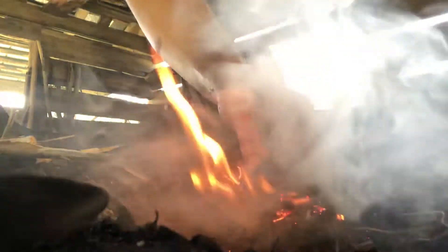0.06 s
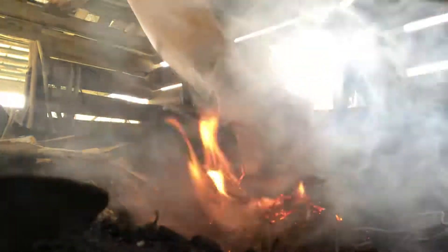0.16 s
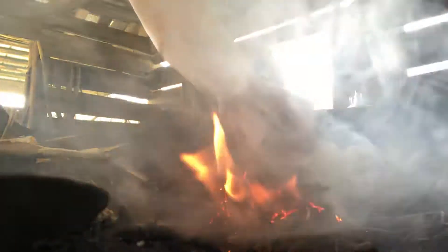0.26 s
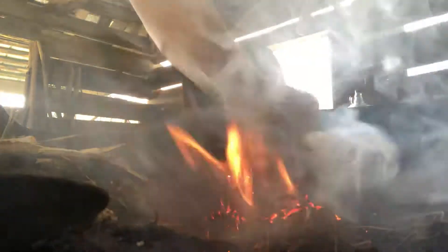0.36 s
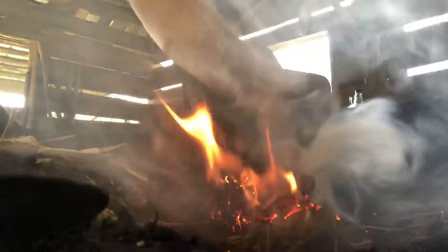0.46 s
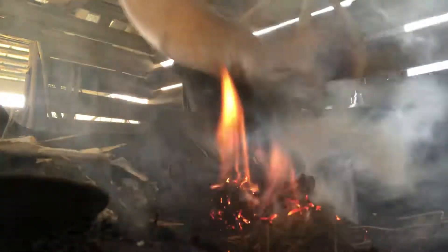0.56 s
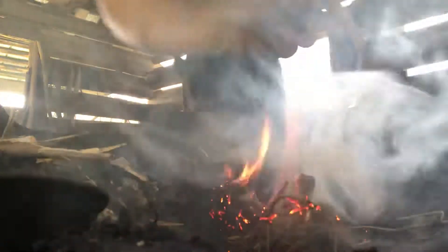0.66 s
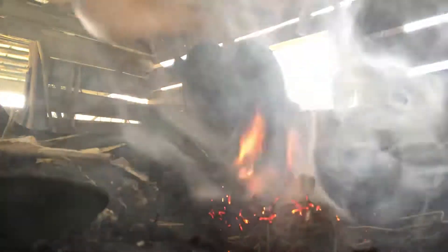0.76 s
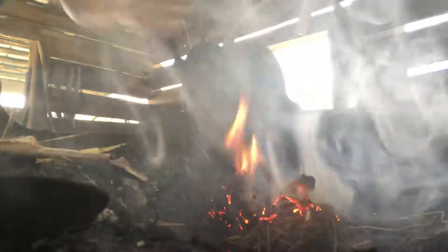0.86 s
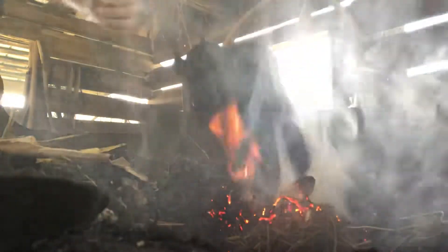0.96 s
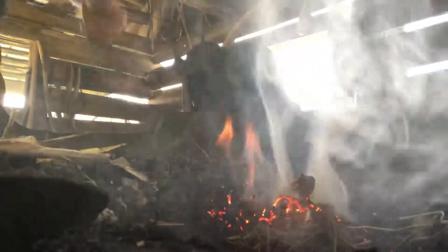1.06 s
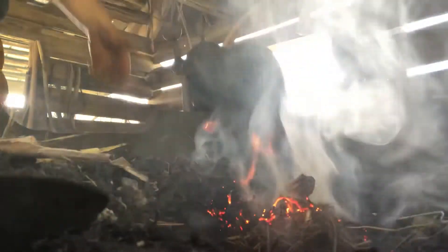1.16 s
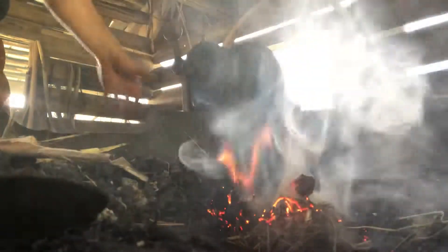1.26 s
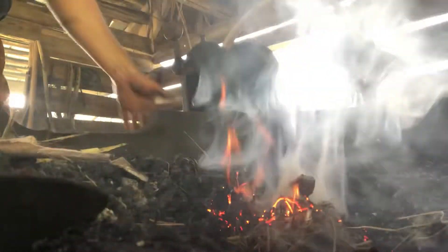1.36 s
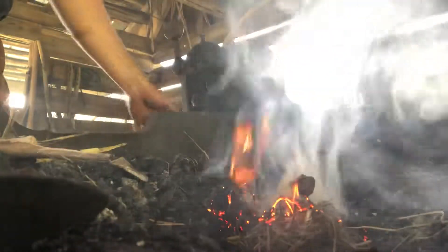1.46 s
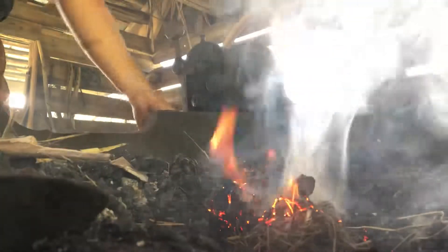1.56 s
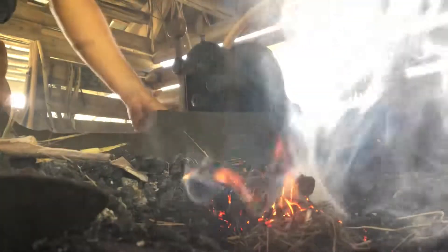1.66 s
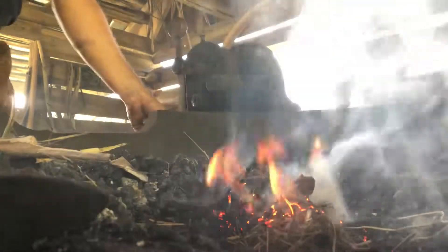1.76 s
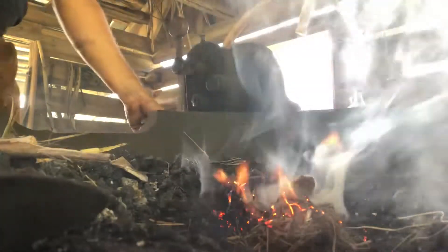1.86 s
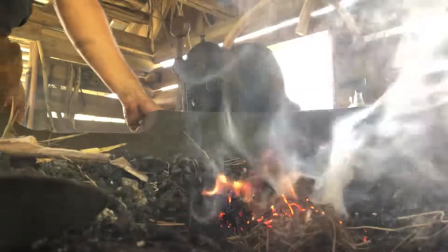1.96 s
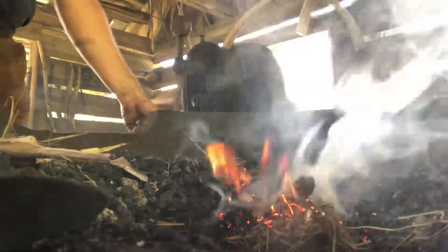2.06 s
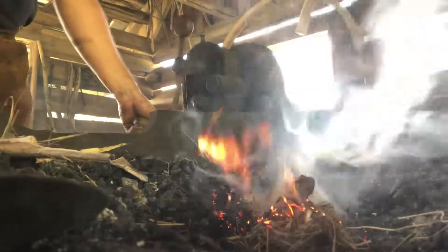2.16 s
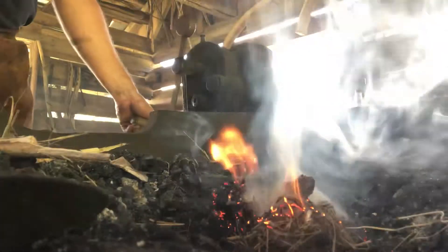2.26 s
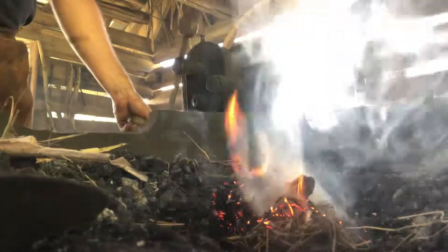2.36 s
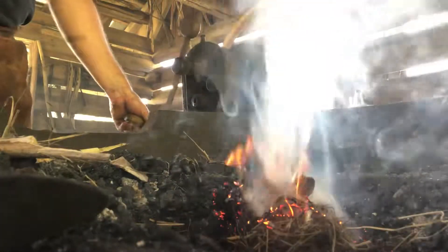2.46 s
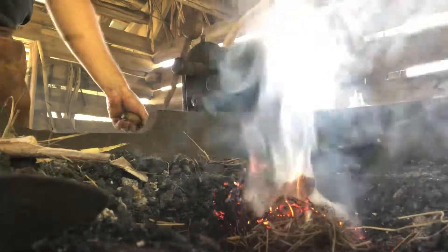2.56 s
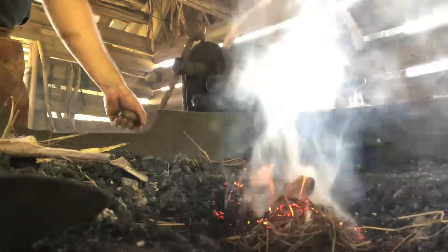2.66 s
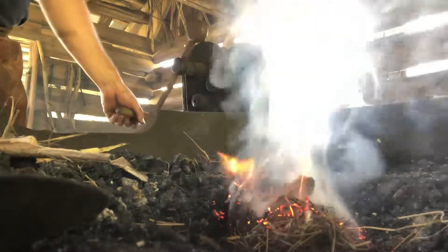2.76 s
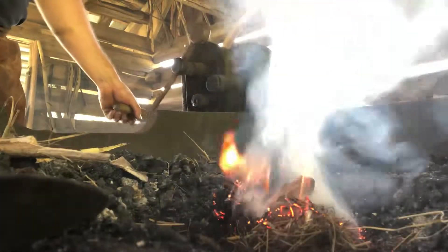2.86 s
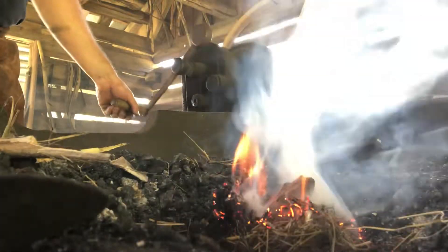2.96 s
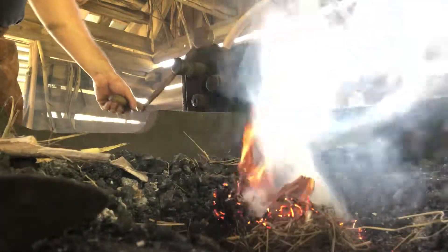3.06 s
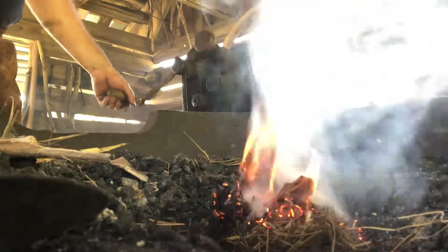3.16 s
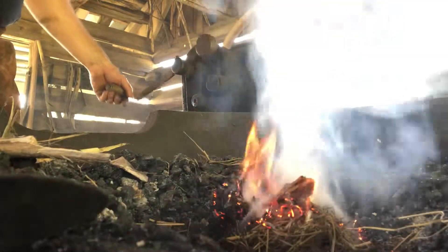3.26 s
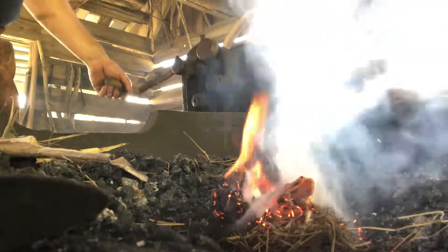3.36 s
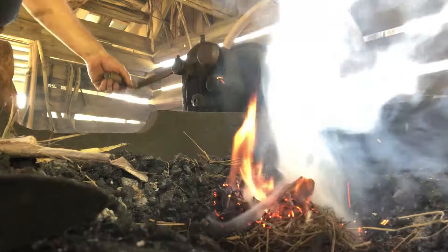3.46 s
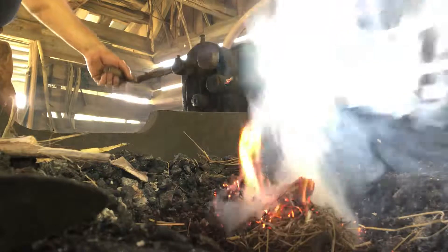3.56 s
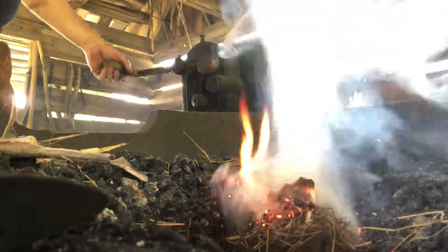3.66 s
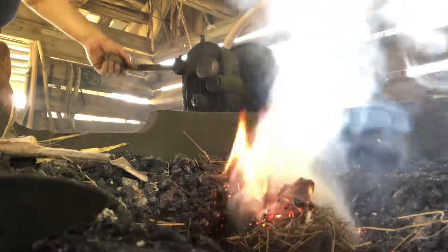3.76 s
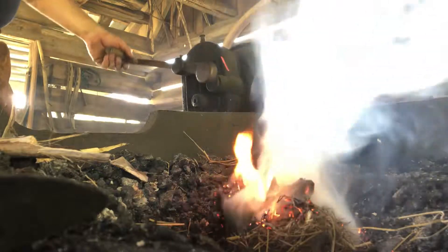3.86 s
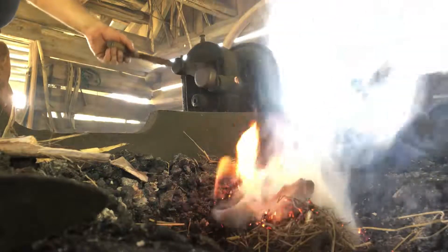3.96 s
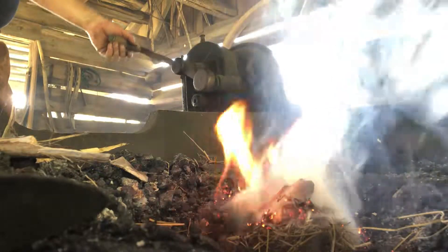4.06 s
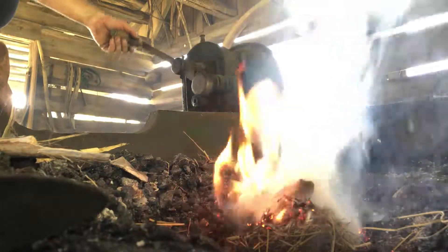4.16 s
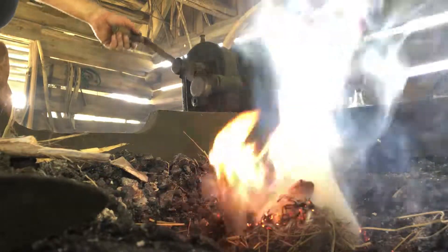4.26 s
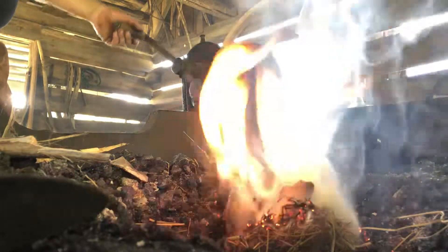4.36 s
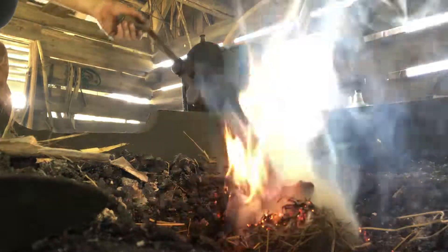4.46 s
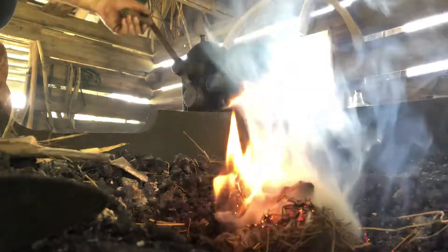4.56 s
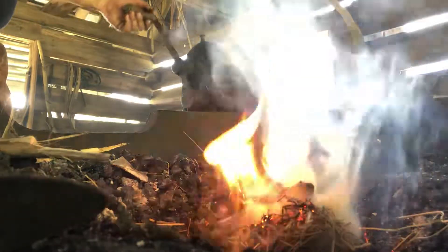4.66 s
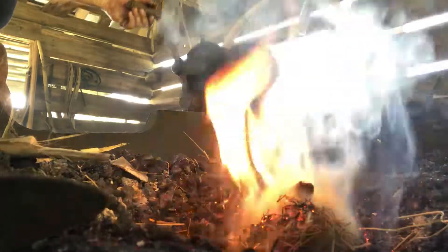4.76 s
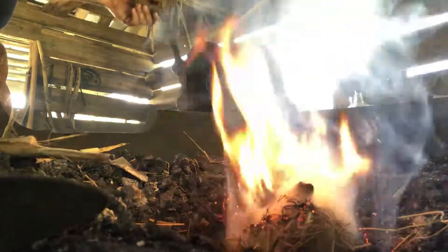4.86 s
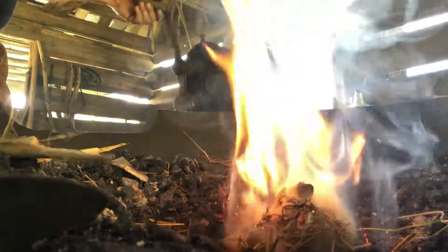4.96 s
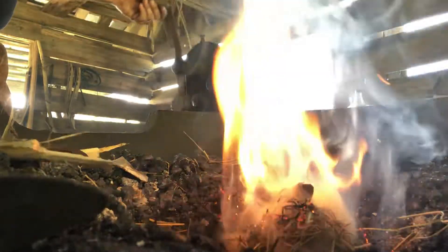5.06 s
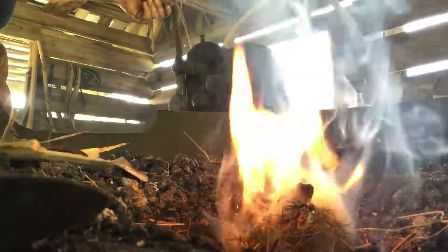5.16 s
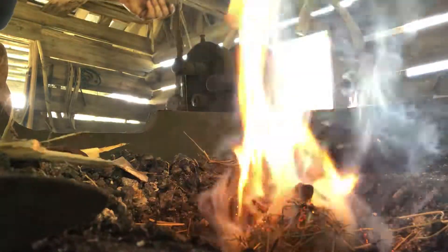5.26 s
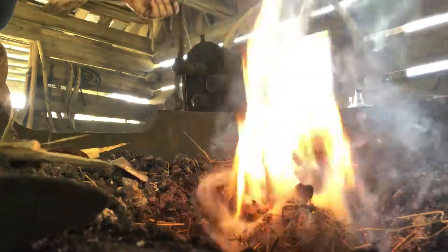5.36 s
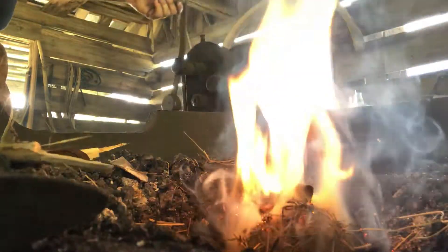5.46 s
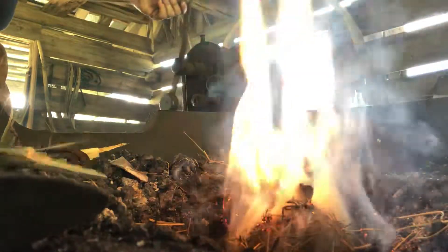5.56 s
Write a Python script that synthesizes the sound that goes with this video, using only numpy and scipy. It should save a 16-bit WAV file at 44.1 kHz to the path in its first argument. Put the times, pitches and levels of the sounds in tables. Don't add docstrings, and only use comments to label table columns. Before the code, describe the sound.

Rattly gear whir fades, a hollow metal knock lands, then the crank blower grinds on with a thin whine and late crackles of burning straw.

```python
import sys
import numpy as np
from scipy import signal
from scipy.fft import rfft, irfft, next_fast_len
from scipy.io import wavfile

SR = 44100
rng = np.random.default_rng(int(sys.argv[2]) if len(sys.argv) > 2 else 0)


def store_pcm(level_fs):
    pcm = np.round(np.clip(level_fs, -1, 1) * 32767).astype(np.int16)
    wavfile.write(sys.argv[1], SR, np.atleast_2d(pcm).T)


def invert_db(level):
    return 10 ** (np.asarray(level, dtype=float) / 20)


N = 247489
TIME = np.arange(N) / SR
HZ = np.fft.rfftfreq(next_fast_len(N + SR // 2), 1 / SR)

# (frequency [Hz], density [dB per Hz])
HISS_COLOUR = [(530, -31), (900, 3), (1320, -7), (1450, -17), (2150, -14.5), (5060, -11), (15500, -18.5)]
HISS_DB, HISS_DROP_S, HISS_DROP_DB = -81, 1.935, -2.5

# (centre [s], level [dB], half length [s])
GUSTS = [
    (.9, -65, 0.83),
    (1.65, -52, 0.047),
    (3.0, -62, 0.23),
    (4.008, -60, 0.22),
    (4.558, -54.5, 0.32),
    (5.2, -66, 0.14),
]
CALM_DB = -80
SCRAPE_S, SCRAPE_END_S, SCRAPE_DB, SCRAPE_DB_PER_S = 1.76, 1.92, -43, 30

# (frequency [Hz], density [dB per Hz])
BLAST_COLOUR = [(15, -63), (30, -56), (65, -16), (120, -31), (260, -19), (520, -24.5), (860, -31),
                (980, -38), (1580, -40), (2220, -43.5), (3300, -47), (8100, -56), (8600, -77),
                (16000, -100)]
BLAST_IDLE_DB, BLAST_DB, FLARE_S, FLARE_DB_PER_S = -79, -76, 5, 7.5

# (time [s], peak [dB], centre [Hz], decay [s])
SNAPS = [
    (1.065, -60, 6000, .012),
    (4.915, -46, 3860, 0.011),
    (4.954, -42, 3880, 0.014),
    (5.355, -54, 4960, 0.023),
    (5.377, -55.5, 3250, .035),
    (5.603, -72, 13500, .04),
]
# (time [s], peak [dB], centre [Hz], decay [s])
SPUTTERS = [(4.931, -59, 4300, .049), (4.939, -50, 2240, 0.062), (4.998, -56, 3970, .03),
            (5.021, -56, 3900, .015), (5.065, -63, 4160, 0.073), (5.093, -52, 3630, 0.019),
            (5.137, -56, 4200, .018), (5.274, -63, 3500, 0.081), (5.304, -52.5, 3000, 0.06),
            (5.312, -68, 9900, .051), (5.321, -56, 3700, 0.027), (5.394, -66, 3460, .036),
            (5.412, -55, 2750, 0.019), (5.504, -64, 3870, .044), (5.573, -58, 2660, 0.1),
            (5.587, -61.5, 4200, 0.19)]
# (time [s], peak [dB], centre [Hz], decay [s])
CLINKS = [(1.582, -48, 2170, 0.065), (1.595, -48, 5030, 0.013), (1.595, -44, 2540, 0.054),
          (1.606, -65, 4900, .056), (1.721, -33, 1880, 0.06), (1.722, -48.5, 2660, 0.052),
          (1.735, -64, 5000, 0.043), (1.79, -61, 2290, 0.053), (1.997, -50, 3760, 0.021),
          (1.999, -53, 2940, 0.035), (4.404, -55, 2580, .028), (4.588, -54, 5000, 0.0092)]
# (time [s], peak [dB], centre [Hz], decay [s])
TICKS = [
    (1.5945, -48, 7500, .006),
    (1.7205, -49, 5460, 0.013),
    (1.9965, -61, 3900, .012),
]
# (least width [Hz], width per centre [Hz/Hz], crack [dB])
PUFF_KINDS = [
    (800, .03, -30),
    (3000, .4, -24),
    (300, 0.33, -7),
    (700, 0.35, -20),
]

# (time [s], peak [dB], frequency [Hz], decay [s])
RINGS = [(1.595, -46, 5060, 0.0082), (1.721, -20, 324, 0.058), (1.723, -18.5, 467, 0.065),
         (1.722, -30, 800, 0.026), (1.723, -38.5, 656, 0.058), (1.723, -37.5, 857, 0.046),
         (1.721, -51, 1600, .045), (1.722, -48, 1915, 0.043), (1.722, -38.5, 2010, .055),
         (1.736, -29.5, 128.7, 0.22), (1.736, -19.5, 200.8, .075), (1.758, -24, 152, 0.068),
         (1.997, -43.5, 1890, 0.057), (2.001, -25.5, 528, 0.062), (1.999, -38, 624, .04),
         (1.998, -62, 2400, .03), (2.002, -37, 783, 0.13), (2.003, -57, 2620, 0.054),
         (2.148, -41.5, 790, 0.079), (2.162, -40.5, 775, 0.052), (4.73, -60, 1900, 0.22),
         (5.405, -41.5, 790, 0.16)]
RING_RISE_TURNS, RING_BEAT = 3.5, 0.012

# (frequency [Hz], width [Hz], coasting [dB], cranked [dB], struck [dB])
STAND = [(69.5, 10, -32, -29, -39), (122.3, 8.1, -10.5, -9, -13.5), (142.5, 6.6, -17, -13.5, 9),
         (190, 34, -14, -14.5, -7.5), (205.6, 12.5, -12, -5, 9.5), (248.1, 21, -4, 1, -9),
         (268.4, 21.2, -8, -6.5, -60), (307.6, 12.8, -8, -7, -5), (324, 15.5, -39, -12, 11),
         (387.8, 47, -23, -13.5, 7.5)]
# (frequency [Hz], width [Hz], coasting [dB], cranked [dB], struck [dB])
SHELL = [ (468.2, 26.6, -9, -4, 7), (507.4, 27, 2.5, -10, -9), (534.3, 13.9, 6, 4, 10),
         (572, 51, -11.5, -16, -19.5), (653, 28, -6, -11, -3.5), (743, 34.5, -22, -10, -6.5),
         (818.8, 27, -0.5, -6, -4.5), (908, 70, -31, -24.5, -15.5)]
# (frequency [Hz], width [Hz], coasting [dB], cranked [dB], struck [dB])
CASE = [ (1060, 64, -2, -5, 12), (1233, 82, -0.5, -7, 7.5), (1326, 37, 0, -3.5, 6),
        (1464, 175, 2.5, -8.5, 1), (1551, 43, -16, -1.5, 10.5), (1683, 82, -1, -3.5, 9.5)]
# (frequency [Hz], width [Hz], coasting [dB], cranked [dB], struck [dB])
COVER = [ (1900, 40, -18, 3.5, 6), (2056, 90, -6.5, -2, 2), (2395, 75, -3.5, -4, 0.5),
         (2570, 31, -2, -6.5, -15), (2740, 47, -4.5, -6, -6.5), (3250, 380, -9, -19.5, -33)]
PARTS = [STAND, SHELL, CASE, COVER]
COASTING, CRANKED, STRUCK = 2, 3, 4

# (time [s], peak [dB], hardness [dB], length [s])
STAND_BLOWS = [(1.608, -37.5, -9, 0.031), (1.695, -39, -15, .01), (1.721, -24, -4, 0.009),
               (1.736, -19.5, -16, 0.0045), (1.752, -26, -16, .009), (1.768, -37.5, -19, 0.037),
               (1.818, -33, -29, 0.025), (3.864, -56, -21, 0.014), (4.402, -30, -11.5, 0.015),
               (4.422, -31.5, -24, 0.016), (4.588, -26, -7.5, 0.011), (4.606, -33, -7.5, 0.0033),
               (5.288, -34.5, -25, 0.0063)]
# (time [s], peak [dB], hardness [dB], length [s])
SHELL_BLOWS = [
    (1.996, -44, 3.5, .018),
    (2.038, -46.5, -13, .014),
    (2.146, -47.5, -21, 0.02),
    (2.208, -49.5, -24, 0.02),
    (3.979, -53, -16, .018),
    (4.159, -45, -12, 0.0068),
    (4.488, -46.5, -7, .0076),
]
# (time [s], peak [dB], hardness [dB], length [s])
CASE_BLOWS = [
    (4.288, -49, 1.5, .008),
    (4.578, -49, 5, 0.0045),
]
STAND_SHELL_DB, CLANK_SHELL_DB, TICK_SHELL_DB = -1, 14.5, -9
STAND_COVER_DB, CLANK_COVER_DB, TICK_COVER_DB = -7, -2, -9

# (time [s], level [dB])
SPEED = [(0.0, -3), (0.28, -7), (0.5, -5.5), (0.97, -12.5), (1.15, -16), (1.4, -27.5), (1.6, -7),
         (1.94, -18), (2.09, -7), (2.28, -5.5), (2.56, -1.5), (2.78, 0.1), (3.72, 2.2), (4.28, 0.8),
         (4.75, 0), (4.98, 0.5), (5.2, 0.5), (5.61, -0.9)]
# (start [s], length [s], level [dB])
SINGS = [
    (2.6, 1.074, -65),
    (3.76, 0.23, -72.5),
    (5.03, 0.062, -70),
]
WHINE_DB, WHINE_SHARE = -82, 0.33
WHINE_HZ, WHINE_WIDTH_HZ, WHINE_SAG_HZ_PER_S = 1577, 17.5, -14.5
SING_RISE_S, SING_SAG_DB_PER_S = 0.02, -3
SING_THROB_DB, SING_THROB_PER_S, SING_TOP_S = 2.5, 7.5, 3.195

# (full speed [dB], share of speed [dB/dB], unloaded [dB], shudder [dB])
WHIR_PARTS = [
    (-41, 0.26, -1.5, -37.5),
    (-44.5, .55, -13, -51),
    (-63, 0.85, -1.5, -78),
    (-68.5, 1.46, -2.5, -73),
]
GRIP_S, PINION_PER_S, TEETH_PER_S = 1.605, 8.1, 420
TAKE_UP_S = 0.2
SHUDDER_RISE_S, SHUDDER_HOLD_S, SHUDDER_DB_PER_S = 0.017, 0.12, -72


def evened(x):
    return x / np.sqrt(np.mean(x ** 2) + 1e-20)


def step(s, rise_s):
    return np.clip((TIME - s) / rise_s, 0, 1)


def speed_db():
    s, db = np.transpose(SPEED)
    return np.interp(TIME, s, db)


def through(x, response):
    return irfft(rfft(x, 2 * len(HZ) - 2) * response)[:N]


def add(mix, s, sound):
    part = mix[round(s * SR):][:len(sound)]
    part += sound[:len(part)]


def wander(per_s):
    return evened(through(rng.standard_normal(N), 1 / (1 + (HZ / per_s) ** 4)))


def band_noise(colour, lo_hz, hi_hz):
    f, db = np.transpose(colour)
    shape = invert_db(np.interp(np.log(HZ + 1), np.log(f + 1), db))
    inside = (HZ > lo_hz) & (HZ < hi_hz)
    return through(rng.standard_normal(N), shape / np.sqrt(np.sum(shape[inside] ** 2) / len(HZ)))


def part_modes(part, column, damping=1):
    h = 0
    for k, mode in enumerate(PARTS[part]):
        peak = 1 / (1 + 1.3j * (HZ - mode[0]) / (damping * mode[1])) ** 2
        h = h + (-1) ** k * invert_db(mode[column]) * peak
    return h / np.sqrt(np.mean(abs(h) ** 2))


def hiss():
    level_db = HISS_DB + HISS_DROP_DB * step(HISS_DROP_S, 0.03) + 0.35 * wander(15)
    return invert_db(level_db) * band_noise(HISS_COLOUR, 7700, 14300)


def rumble():
    band = (HZ / 44) ** 4 / (1 + (HZ / 44) ** 4) / (1 + (HZ / 95) ** 4)
    low = evened(through(rng.standard_normal(N), band))
    buffet = invert_db(CALM_DB)
    for s, db, half_s in GUSTS:
        buffet = buffet + invert_db(db) * np.exp(-((TIME - s) / half_s) ** 2)
    dragging = step(SCRAPE_S, 0.043) - step(SCRAPE_END_S, 0.029)
    scrape = invert_db(SCRAPE_DB + SCRAPE_DB_PER_S * np.minimum(TIME - SCRAPE_END_S, 0)) * dragging
    return invert_db(-6.5) * (buffet + scrape) * low


def blast():
    cranked_db = (BLAST_DB - BLAST_IDLE_DB) * step(GRIP_S, 0.058)
    flare_db = FLARE_DB_PER_S * np.maximum(TIME - FLARE_S, 0)
    level_db = BLAST_IDLE_DB + cranked_db + flare_db - 4.0 + 1.43 * wander(35)
    return invert_db(level_db) * band_noise(BLAST_COLOUR, 3880, 8600)


def shed(x):
    t = np.arange(SR // 4) / SR
    echoes = rng.choice([-1., 1.], len(t)) * (rng.random(len(t)) < 0.045)
    tail = echoes * invert_db(-60 * t / 0.099) * (t > 0.004)
    return signal.fftconvolve(x, tail / np.linalg.norm(tail))[:N]


def puffs(rows, kind):
    least_hz, spread, crack_db = kind
    out, t = np.zeros(N), np.arange(SR // 8) / SR
    hz = np.fft.rfftfreq(len(t), 1 / SR)
    for s, db, centre_hz, decay_s in rows:
        a, b = rng.standard_normal((2, len(t)))
        grit = a * (0.51 + 3.2 * (rng.random(len(t)) < 0.012))
        width_hz = least_hz + spread * centre_hz
        band = 1 / (1 + (2 * (hz - centre_hz) / width_hz) ** 2)
        puff = evened(irfft(rfft(grit) * band, len(t)))
        puff = puff * invert_db(-30 * t / decay_s) * np.minimum(t / 0.0023, 1)
        crack = signal.lfilter([1, -1], [1, -0.8], b) * np.exp(-((t - 0.004) / 0.0024) ** 2)
        add(out, s, invert_db(db - 5.5) * (puff + invert_db(crack_db - 3.5) * crack))
    return out


def straw():
    return puffs(SNAPS, PUFF_KINDS[2]) + puffs(SPUTTERS, PUFF_KINDS[3])


def clinks():
    return puffs(CLINKS, PUFF_KINDS[0]) + puffs(TICKS, PUFF_KINDS[1])


def rings():
    out, t = np.zeros(N), np.arange(SR // 4) / SR
    for s, db, hz, decay_s in RINGS:
        a, b = rng.random(2)
        pair = np.sin(2 * np.pi * (hz * t + 0.11 * a))
        pair = pair + 0.34 * np.sin(2 * np.pi * (hz * (1 + RING_BEAT) * t + b))
        rise = np.minimum(t * hz / RING_RISE_TURNS, 1)
        add(out, s, invert_db(db - 30 * t / decay_s) * rise * pair)
    return out


def blow(db, hard_db, length_s, shell_db, cover_db, responses):
    t = np.arange(SR // 8) / SR
    out = 0
    for part_db, response in zip([0, shell_db, hard_db, hard_db + cover_db], responses):
        push = rng.standard_normal(len(t)) * np.exp(-t / length_s)
        ring = signal.fftconvolve(push, response)
        out = out + invert_db(db - 5.5 + part_db) * ring / abs(ring).max()
    return out


def knocks():
    out = np.zeros(N)
    responses = [irfft(part_modes(part, STRUCK, damping=1.79))[:SR // 4] for part in range(4)]
    kinds = [(STAND_BLOWS, STAND_SHELL_DB, STAND_COVER_DB),
             (SHELL_BLOWS, CLANK_SHELL_DB, CLANK_COVER_DB),
             (CASE_BLOWS, TICK_SHELL_DB, TICK_COVER_DB)]
    for rows, shell_db, cover_db in kinds:
        for s, db, hard_db, length_s in rows:
            add(out, s, blow(db, hard_db, length_s, shell_db, cover_db, responses))
    return out


def whine():
    mode = 1 / (1 + 1.3j * (HZ - WHINE_HZ) / WHINE_WIDTH_HZ) ** 2
    fuzz = through(rng.standard_normal(N), mode)
    tone_hz = WHINE_HZ + WHINE_SAG_HZ_PER_S * (TIME - SING_TOP_S) + 5.34 * wander(6.05)
    tone = np.sin(2 * np.pi * np.cumsum(tone_hz) / SR) * invert_db(2.2 * wander(8.4))
    level = invert_db(WHINE_DB + WHINE_SHARE * speed_db())
    for s, length_s, db in SINGS:
        locked = step(s, SING_RISE_S) - step(s + length_s, 2 * SING_RISE_S)
        level = level + invert_db(db + SING_SAG_DB_PER_S * (TIME - s)) * locked
    throb_db = SING_THROB_DB * np.cos(2 * np.pi * SING_THROB_PER_S * (TIME - SING_TOP_S))
    return level * invert_db(throb_db - 1.5) * evened(0.7 * evened(fuzz) + 0.75 * evened(tone))


def gears():
    load = step(GRIP_S, 0.017)
    turn = np.cumsum(PINION_PER_S * (1 + 0.047 * wander(0.12))) / SR
    throb = invert_db(0.62 * np.cos(2 * np.pi * turn) + 0.31 * wander(19))
    hits = rng.random((5, N)) < TEETH_PER_S / SR
    force = invert_db(2.2 * np.minimum(rng.exponential(1, (5, N)), 3))
    teeth = hits * force * rng.standard_normal((5, N))
    shudder_db = SHUDDER_DB_PER_S * np.maximum(TIME - GRIP_S - SHUDDER_HOLD_S, 0)
    shudder = step(GRIP_S, SHUDDER_RISE_S) * invert_db(shudder_db)
    slack = 1 - step(GRIP_S, TAKE_UP_S)
    out = np.zeros(N)
    for part, (full_db, share, idle_db, shake_db) in enumerate(WHIR_PARTS):
        taps = evened(0.52 * teeth[4] + teeth[part])
        unsteady = throb * invert_db(1.23 * wander(8.5))
        rub = rng.standard_normal(N)
        drive = evened(unsteady * (0.78 * taps + 0.56 * rub))
        coasting = through((1 - load) * drive, part_modes(part, COASTING))
        cranked = through(load * drive, part_modes(part, CRANKED))
        level = invert_db(full_db + share * speed_db() + idle_db * slack) + invert_db(shake_db) * shudder
        out += invert_db(-3.0) * level * (coasting + cranked)
    return out


def scene():
    hits = knocks() + clinks() + straw() + rings()
    blower = gears() + whine()
    echoes = invert_db(-15.5) * shed(hits)
    air = blast() + rumble() + hiss()
    return (blower + hits + echoes + air)[None]


def band_limit(x):
    return signal.sosfilt(signal.butter(12, 15670, fs=SR, output="sos"), x)


def record(dry):
    bass_cut = signal.butter(2, 38, "high", fs=SR, output="sos")
    mix = signal.sosfilt(bass_cut, dry)
    return band_limit(mix)


dry = scene()
out = record(dry)
store_pcm(out)
```